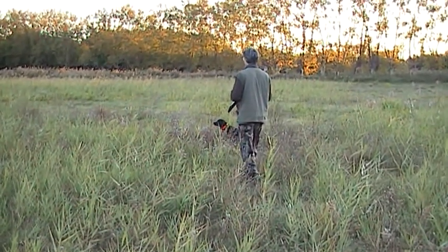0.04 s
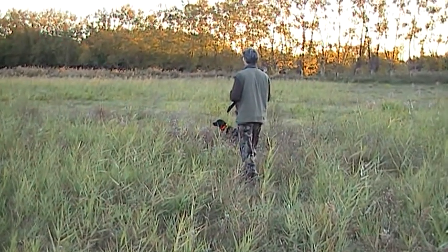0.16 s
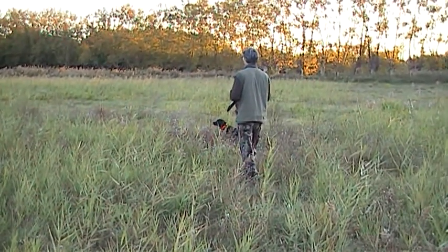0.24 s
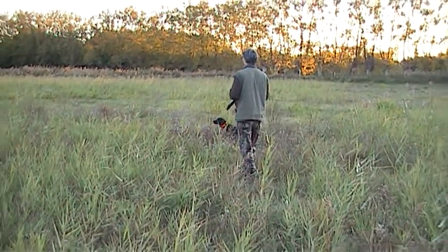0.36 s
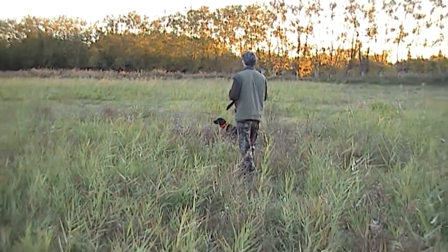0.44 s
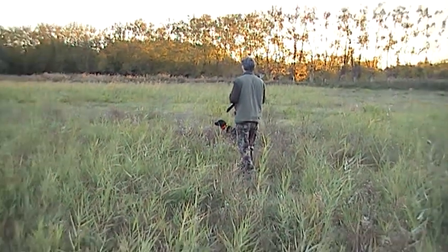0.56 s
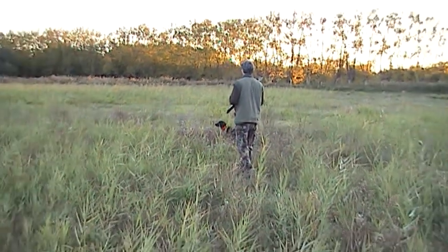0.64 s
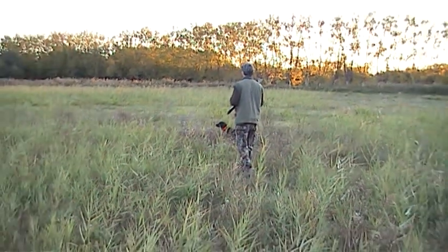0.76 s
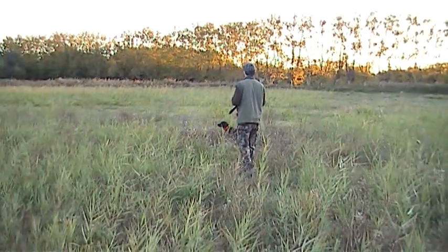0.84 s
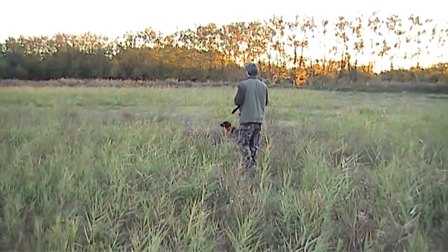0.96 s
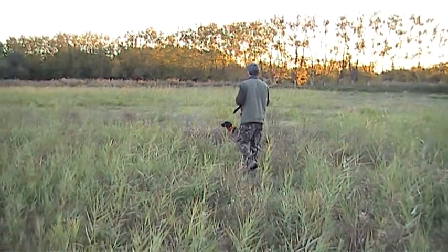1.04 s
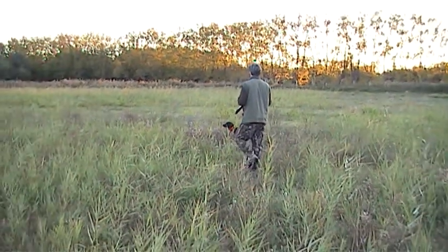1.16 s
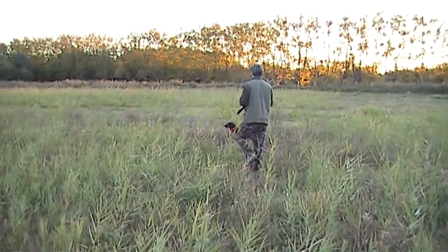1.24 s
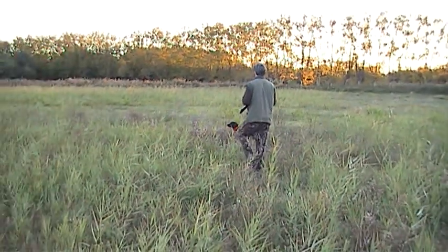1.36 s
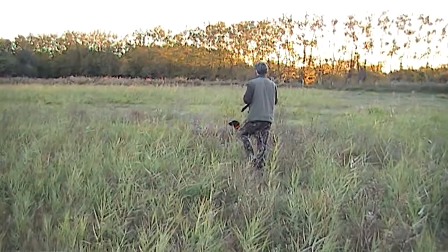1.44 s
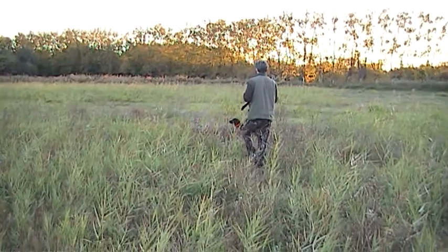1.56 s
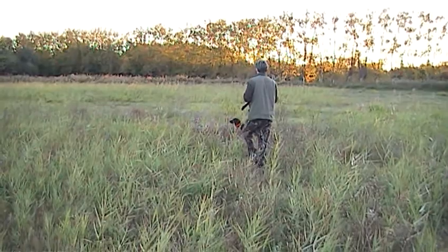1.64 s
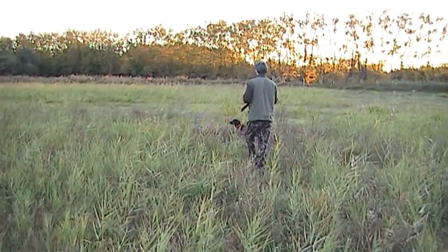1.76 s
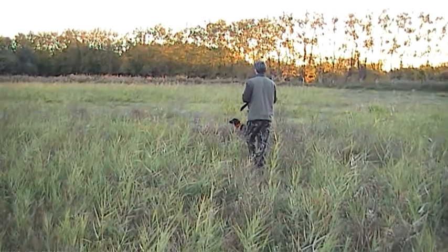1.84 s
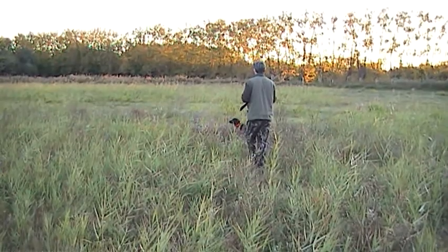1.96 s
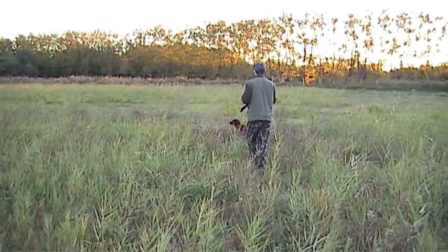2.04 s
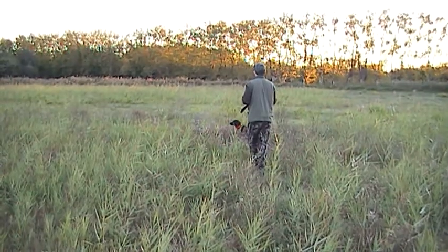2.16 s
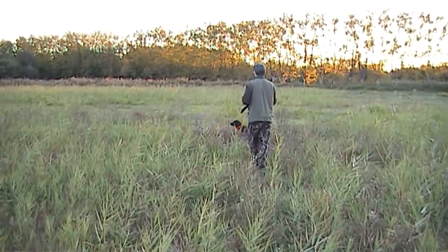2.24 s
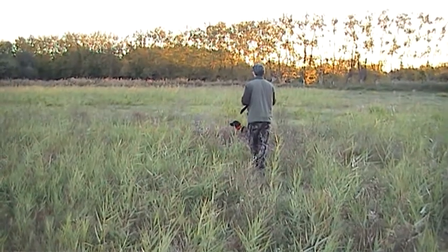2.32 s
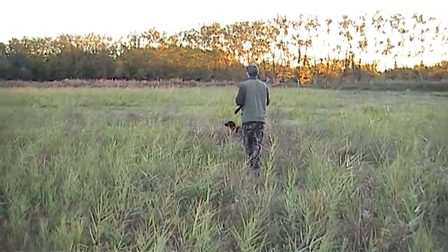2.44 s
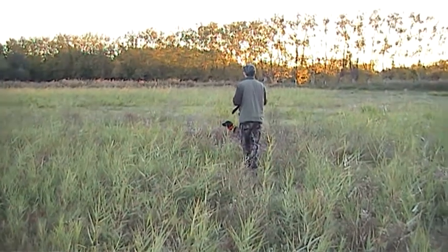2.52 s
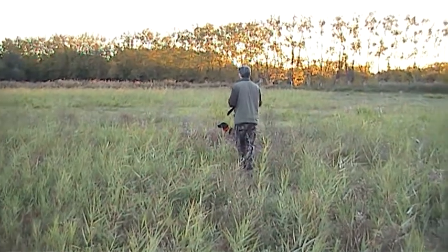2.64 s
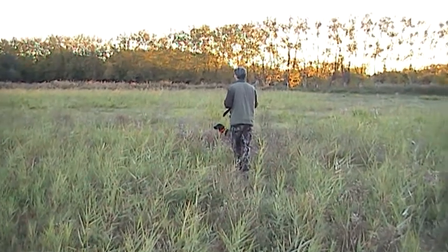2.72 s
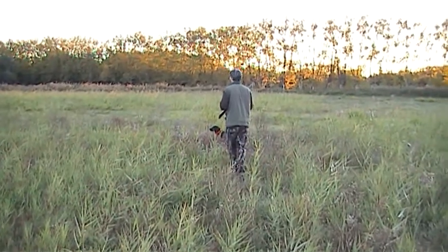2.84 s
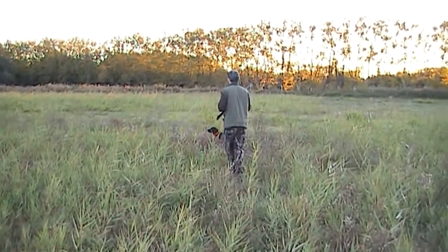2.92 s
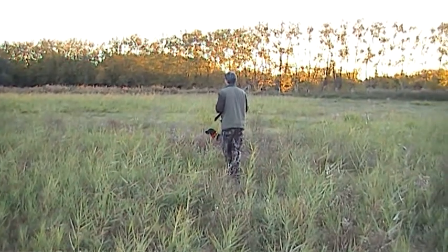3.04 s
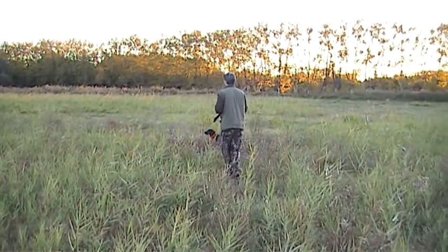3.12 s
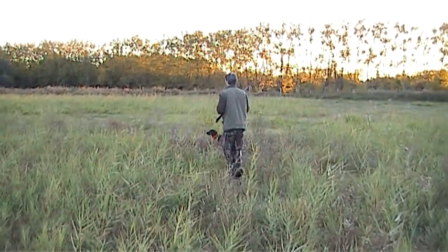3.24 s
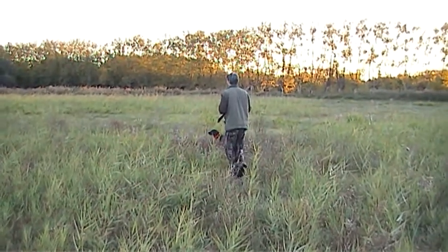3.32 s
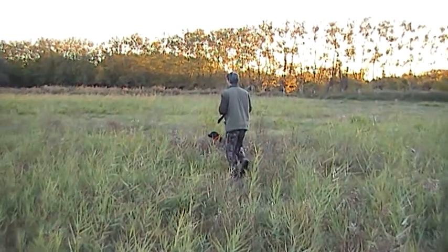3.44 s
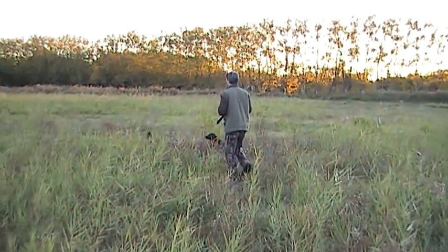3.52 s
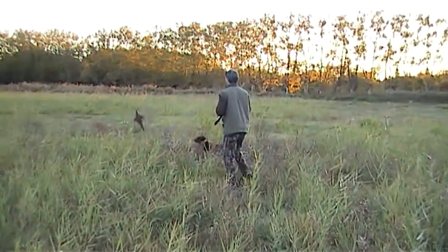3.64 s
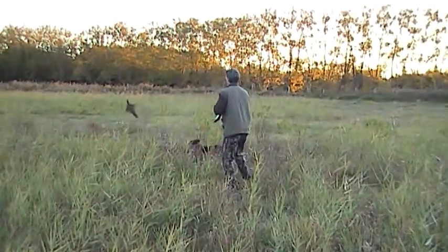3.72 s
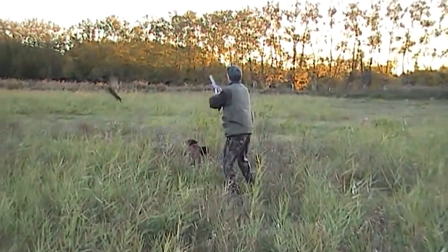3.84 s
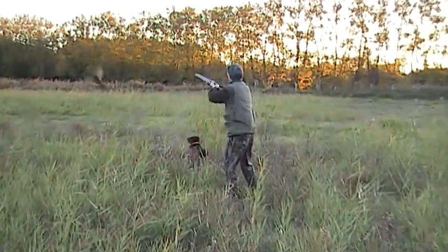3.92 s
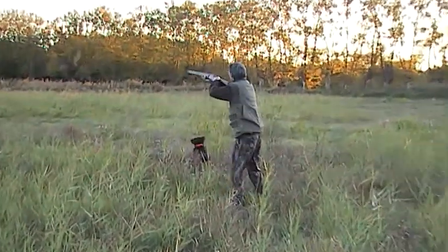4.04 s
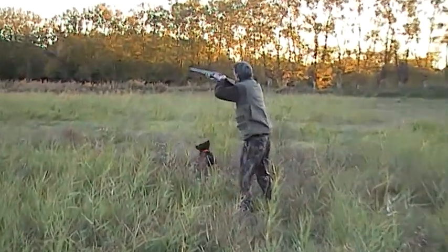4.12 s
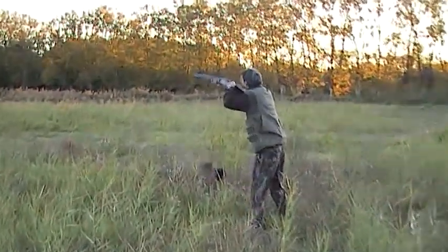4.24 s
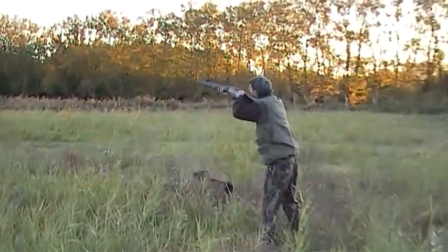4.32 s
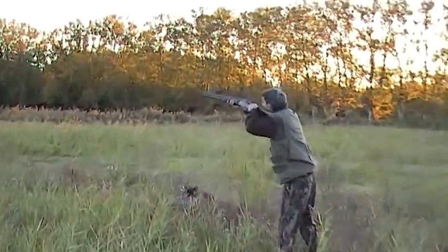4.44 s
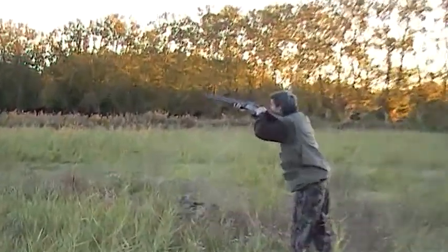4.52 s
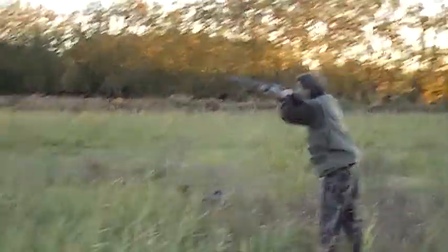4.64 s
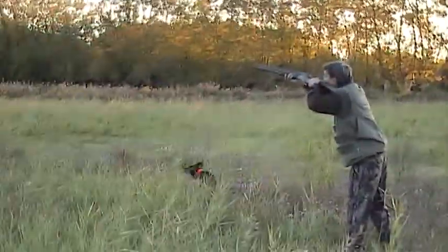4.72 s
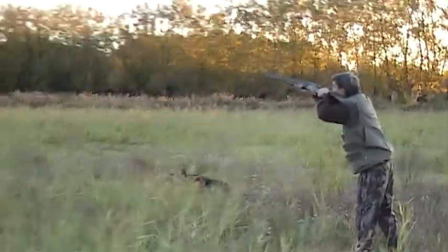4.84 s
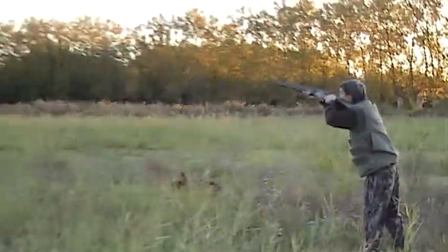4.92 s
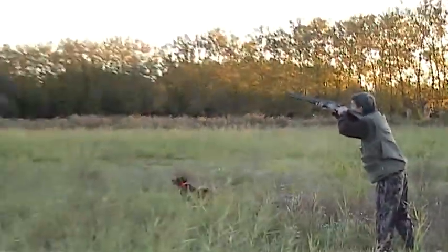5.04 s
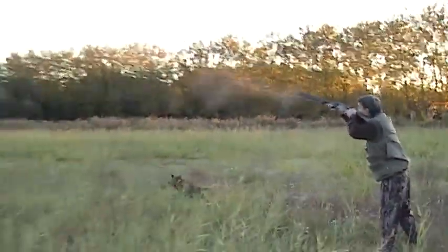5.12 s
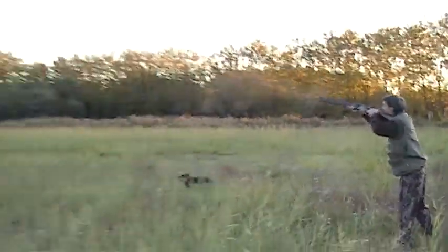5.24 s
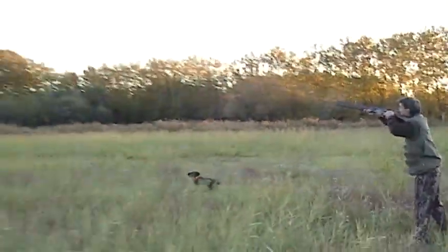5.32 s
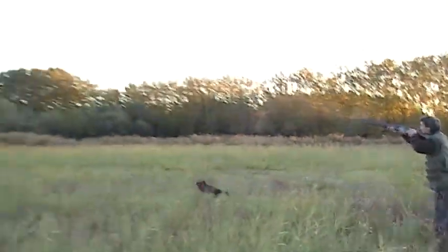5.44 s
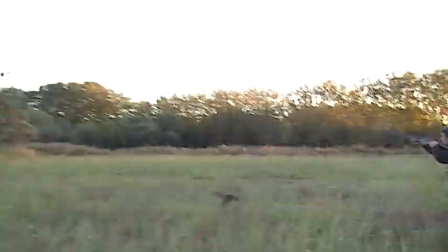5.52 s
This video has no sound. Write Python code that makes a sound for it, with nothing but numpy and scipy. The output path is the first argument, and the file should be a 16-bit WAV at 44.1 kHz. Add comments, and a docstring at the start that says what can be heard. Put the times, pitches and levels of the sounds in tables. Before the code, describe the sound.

Outdoors in an open field, a hunter and dog move softly through tall dry grass over a faint countryside murmur. A pheasant suddenly thrashes out and whirrs away with quick wingbeats. The rustling grows, the gun knocks dully and clicks brightly, then a single shot overloads the close camera microphone, followed by hiss and rolling tree-line echoes.

```python
"""One gunshot overloads the microphone, hisses back from the grass and rolls along the tree line.
Before it, a hunter and his dog wade through tall grass in a quiet field edged by trees.
A pheasant bursts out of cover and whirrs away; the gun is shouldered with a knock and a click.
Coloured noise bursts make the impacts and wingbeats, random clicks the grass, feather whirr and
returning shot, gliding tones the whistles; the blast adds a bare pressure pulse."""
import sys
import numpy as np
from scipy import signal
from scipy.fft import rfft, irfft
from scipy.io import wavfile

SR = 44100
rng = np.random.default_rng(int(sys.argv[2]) if len(sys.argv) > 2 else 0)


def wav_record(signal):
    """Record a signal, one row per channel, as 16-bit PCM in the file named by sys.argv[1]."""
    frames = np.transpose(np.atleast_2d(signal))
    bounded = np.clip(frames, -1, 1)
    # unit amplitude maps onto the largest positive 16-bit level
    quanta = np.round(bounded * 32767).astype(np.int16)
    wavfile.write(sys.argv[1], SR, quanta)


N = 245758
TIME = np.arange(N) / SR
BINS_HZ = np.maximum(np.fft.rfftfreq(8192, 1 / SR), 1)

# resonances of the air squeezed from under a wing: [f/Hz, width/Hz, relative level/dB]
WING = [(150, 230, -4.5), (490, 340, 2.5), (690, 400, 1), (1090, 320, -9), (1580, 470, -7), (2345, 400, 0),
        (3460, 1100, -9), (7500, 3000, -14.5)]
# unrelated sound between the channels for a source at one place: [f/Hz, side level/dB]
DIRECT = [(100, -40), (900, -19), (2200, -15.5), (4000, -10), (7500, -11), (11000, -13)]

# the bird breaks cover (s); steady stir of the grass while stalking and once the dog runs (dB)
FLUSH_S, STALKING_DB, RUNNING_DB = 3.47, -70, -59.5
# first downstroke (s) and even rate of the wings (per s)
TAKEOFF_S, BEATS_PER_S = 3.584, 12.2
BLAST_S = 5.1325


def from_db(db):
    """Decibels to gain."""
    return 10 ** (np.asarray(db) / 20)


def rms_one(x):
    """Scale to unit power."""
    return x / np.sqrt(np.mean(np.abs(x) ** 2) + 1e-20)


def gains(points):
    """A (Hz, dB) table as a gain at every frequency."""
    hz, db = np.transpose(points)
    return from_db(np.interp(np.log(BINS_HZ), np.log(hz), db))


def causal(gain):
    """Minimum-phase response of unit power with the given magnitude: nothing sounds early."""
    cepstrum = irfft(np.log(rms_one(gain) + 1e-6))
    half = len(cepstrum) // 2
    cepstrum[1:half] *= 2
    cepstrum[half + 1:] = 0
    return np.exp(rfft(cepstrum))


def colour(points):
    """Response of unit power that follows a (Hz, dB) table."""
    return causal(gains(points))


def body(modes):
    """Response of resonances with steep skirts and dark valleys between them."""
    peaks = []
    for hz, width, db in modes:
        detuning = (BINS_HZ ** 2 - hz ** 2) / (BINS_HZ * width)
        peaks.append(from_db(db) / (1 + detuning ** 2))
    return causal(np.linalg.norm(peaks, axis=0))


def dulled(top_hz, order=6):
    """Gain that falls steeply above a frequency."""
    return 1 / np.sqrt(1 + (BINS_HZ / top_hz) ** (2 * order))


def sound(drive, response, spread, off_axis=1):
    """Two unrelated drives pass through a response to the mid and side of a stereo microphone."""
    # pressure difference between the two microphone ports: [f/Hz, side level/dB]
    ports = [(100, -38), (4000, -26), (7500, -27), (9500, -3.5), (11500, 7), (15000, -1)]
    # sound arriving at an angle leaves this difference a quarter cycle ahead
    paths = response * np.array([np.ones(len(BINS_HZ)), gains(spread), 1j * off_axis * gains(ports)])
    kernels = np.fft.fftshift(irfft(paths), axes=-1)
    mid, side, gradient = signal.oaconvolve(drive[[0, 1, 0]], kernels, mode="same", axes=-1)
    return mid + (side + gradient) * [[1], [-1]]


def drift(rate):
    """Smooth chance that changes about `rate` times a second; spread 1."""
    return rms_one(np.interp(TIME * rate, np.arange(N // 20), rng.standard_normal(N // 20)))


def swell(s, half_s):
    """A smooth rise and fall of height 1 around a moment."""
    return np.exp(-((TIME - s) / half_s) ** 2)


def flushed(rise_s=0.014):
    """0 while the bird sits tight, 1 once it has broken cover."""
    return np.clip((TIME - FLUSH_S) / rise_s, 0, 1)


def hold_and_fade(age, db, hold_s, fade_db_per_s):
    """Gain that holds for a while and then dies away."""
    return from_db(db - fade_db_per_s * np.maximum(age - hold_s, 0))


def grains(per_s, size_db):
    """Two streams of random clicks of uneven size, unit power."""
    born = rng.random((2, N)) < per_s / SR
    sizes = from_db(size_db * np.minimum(rng.exponential(1, (2, N)), 4))
    return rms_one(born * sizes * rng.choice([-1, 1], (2, N)))


def bursts(rows, size=4096):
    """Short white bursts that swell and die, one for each row (s, dB, rise s, fall s)."""
    lead = size // 4   # room for the rise ahead of each moment
    out = np.zeros((2, N + size))
    t = (np.arange(size) - lead) / SR
    for s, db, rise, fall in rows:
        shape = np.exp(-np.where(t < 0, (t / rise) ** 2, t / fall))
        burst = shape * rng.standard_normal((2, size))
        for _ in range(2):   # an impact excites all frequencies evenly
            burst = np.sqrt(shape) * irfft(np.exp(1j * np.angle(rfft(burst))))
        start = min(round(s * SR), N)
        out[:, start:start + size] += from_db(db) * rms_one(burst) * np.sqrt(np.mean(shape ** 2))
    return out[:, lead:lead + N]


def whistles(rows, waver):
    """Brief, unsteady tones sliding in pitch: rows (s, length s, start Hz, end Hz, dB)."""
    out = np.zeros(N)
    unsteady = 1 + waver * drift(900)
    for s, length, start_hz, end_hz, db in rows:
        on = (TIME > s) & (TIME < s + length)
        along = (TIME[on] - s) / length
        hz = (start_hz + (end_hz - start_hz) * along) * unsteady[on]
        tone = np.sin(2 * np.pi * np.cumsum(hz) / SR)
        arch = np.sqrt(np.maximum(np.sin(np.pi * along), 0))
        out[on] += from_db(db) * arch * tone
    return out


def field(drive_db=-58.55, waver_db=0.66):
    """Distant murmur of the countryside: wavering noise arriving from all sides."""
    # colour of the far murmur: [f/Hz, relative level/dB per Hz]
    murmur = [(15, -69), (25, -25), (45, -7.5), (71, 0.5), (183, -3), (482, 0), (648, -4.5), (997, -4.5),
              (1240, -10.5), (2630, -20), (4150, -19.5), (4750, -22), (8130, -21.5), (12200, -22.5),
              (15500, -27)]
    # unrelated sound between the channels when it comes from all round: [f/Hz, side level/dB]
    diffuse = [(60, -14.5), (300, -14), (900, -10), (2000, 2.5), (4000, 4), (7500, 4), (12000, -19)]
    hush = gains([(1200, 0.5), (3000, -3.0), (8000, -7.5)])   # softens the treble
    drive = rng.standard_normal((2, N)) * from_db(drive_db + waver_db * drift(5.16))
    return sound(drive, colour(murmur) * hush, diffuse)


def rustle_db():
    """How hard the grass is brushed: a steady stir that jumps at the flush, and single sweeps."""
    # legs, dog and bird sweeping through the grass: [t/s, level/dB, half length/s]
    swishes = [(0.203, -68, 0.06), (.64, -67, 0.037), (1.688, -65.5, 0.31), (2.26, -67, 0.18),
               (2.676, -69, 0.082), (3.313, -59, .11), (3.548, -48, 0.041), (3.707, -49.5, 0.085),
               (3.92, -53.5, 0.056), (4.295, -54.5, 0.12), (4.485, -55.5, 0.03), (4.65, -52.5, 0.1),
               (4.804, -52.5, 0.051), (4.964, -50.5, 0.037), (5.075, -51, .035)]
    stir = from_db(STALKING_DB + (RUNNING_DB - STALKING_DB) * flushed())
    sweeps = [from_db(db) ** 2 * swell(s, half_s) for s, db, half_s in swishes]
    return 10 * np.log10(stir ** 2 + sum(sweeps))


def small_snaps(level_db, count=18, follows=0.45, stalking_tick_db=-52.5, stalking_wood_db=-59):
    """Lesser snaps at random moments, stronger in harder-brushed grass: (s, dB, woody part dB)."""
    moments = ((np.arange(count) + rng.random(count)) * N / count).astype(int)
    lift_db = follows * (level_db[moments] - STALKING_DB)
    return [(i / SR, stalking_tick_db + db, stalking_wood_db + db) for i, db in zip(moments, lift_db)]


def grass(blades_db=-1.06, clump_db=2.0, tick_trim_db=-3, wood_trim_db=1):
    """Blades scrape in clumps of tiny clicks; now and then a stem or a twig snaps."""
    # colour of dry blades: [f/Hz, relative level/dB per Hz]
    dry_blades = [(90, -25), (160, -5.5), (260, -4.5), (550, -7), (930, -2.5), (1300, -6), (2900, -6.5),
                  (4100, -6), (4900, -16), (6200, -6), (8300, 0.5), (10000, -7.5), (12000, -20),
                  (15500, -32)]
    # the bird thrashing free of the cover: [t/s, level/dB, rise/s, fall/s]
    thrash = [(3.474, -50, 0.0042, 0.0083), (3.517, -44, 0.0027, .008), (3.527, -38, 0.0025, 0.013),
              (3.584, -33.5, 0.0043, 0.0056), (3.66, -47, 0.0024, 0.041)]
    # loudest stems snapping, levels ahead of the trims: [t/s, level/dB, woody part level/dB]
    loud_snaps = [(0.0817, -48, -41), (0.1017, -46.5, -56), (0.7605, -46.5, -63), (0.802, -61, -51.5),
                  (2.7048, -45, -57), (3.042, -49.5, -53), (3.4079, -40.5, -58), (3.6177, -27.5, -43),
                  (3.6406, -51, -37), (3.7086, -43, -32.5), (3.7329, -27.5, -46), (4.4965, -33, -49),
                  (4.5985, -34, -47), (4.7945, -32, -49)]
    # twigs giving way underfoot, levels ahead of the treble cut: [t/s, level/dB, rise/s, fall/s, top f/Hz]
    twig_rows = [(.085, -47.5, 0.00066, 0.0097, 6000), (1.423, -43.5, 0.0006, 0.0036, 2400),
                 (1.762, -44.5, 0.00046, 0.0017, 9000), (1.767, -41, 0.0014, 0.0028, 5000)]
    # colour of the twigs: [f/Hz, relative level/dB per Hz]
    twig_colour = [(250, -24), (480, 0.5), (800, 2.5), (1500, -7.5), (2100, -9.5), (2800, -16), (3400, -10),
                   (4500, -22), (6000, -31), (14000, -48)]
    tick = [(1000, -9), (5000, -13.0), (7800, 6.5), (9500, 0), (12000, -14), (15000, -22)]
    wood = [(150, -26), (700, 3.5), (3000, 5.5), (4300, 1.0), (6000, -9), (14000, -21)]

    level_db = rustle_db()
    scrape = grains(5000, size_db=1.5) * from_db(level_db + blades_db + clump_db * drift(66))
    blades = scrape + bursts(thrash)
    snaps = list(loud_snaps) + small_snaps(level_db)
    ticks = bursts([(s, db + tick_trim_db, 0.0002, 0.0009) for s, db, woody in snaps])
    cracks = bursts([(s, woody + wood_trim_db, 0.0002, 0.0012) for s, db, woody in snaps])
    parts = [(blades, dry_blades), (ticks, tick), (cracks, wood)]
    out = sum(sound(drive, colour(spectrum), DIRECT) for drive, spectrum in parts)
    for *burst, top_hz in twig_rows:
        out = out + sound(bursts([burst]), colour(twig_colour) * dulled(top_hz), DIRECT)
    return out


def far_birds():
    """Small birds far off in the trees: faint gliding tones."""
    # [t/s, length/s, start f/Hz, end f/Hz, level/dB]
    chirps = [(.82, 0.2, 2840, 2800, -76), (2.54, .065, 5500, 5270, -75.5), (2.735, 0.077, 3720, 4200, -74),
              (2.925, .05, 5200, 5000, -75)]
    return whistles(chirps, waver=0.0073)


def wingbeats(count=10):
    """Evenly spaced downstrokes that follow the bird's effort: rows (s, level dB)."""
    # strength of the downstrokes, hard in the climb, a lull, a second spurt, then away: [t/s, level/dB]
    effort = [(3.65, -39.5), (3.83, -40.5), (3.99, -46.5), (4.08, -42.5), (4.24, -40.5), (4.33, -49)]
    s = TAKEOFF_S + np.arange(count) / BEATS_PER_S
    return list(zip(s, np.interp(s, *np.transpose(effort))))


def downstroke(s, db, tension, uneven_db=2, rise_s=0.0065, fall_s=0.011):
    """One puff of air with singing quills; the wing is spread a little differently each time."""
    # flight feathers singing, pitch ahead of the tension: [length/s, start f/Hz, end f/Hz, level re stroke/dB]
    quill_rows = [(.009, 2877, 2125, -7), (.01, 4090, 3320, -11.5)]
    chance_db = uneven_db * rng.standard_normal(len(WING))
    modes = [(hz * tension, width, mode_db + more_db)
             for (hz, width, mode_db), more_db in zip(WING, chance_db)]
    quills = [(s - length / 2, length, start_hz * tension, end_hz * tension, db + quill_db)
              for length, start_hz, end_hz, quill_db in quill_rows]
    puff = sound(bursts([(s, db, rise_s, fall_s)]), body(modes), DIRECT)
    return puff + whistles(quills, waver=0.034)


def pheasant(upstroke_lead_s=0.017, upstroke_db=-10, push_db=-17.0, tension_spread=0.039,
             whirr_db=-59.5, climb_db=8, flutter_db=3.5):
    """Kick-off, wing clap, and downstrokes each with a weak flick ahead and a soft low push."""
    # feet pushing off the ground: [t/s, level/dB, rise/s, fall/s]
    kick = [(3.525, -50, 0.0055, 0.039)]
    # dull resonance of the soil: [f/Hz, width/Hz, relative level/dB]
    soil = [(215, 140, 0)]
    # colour of the feather whirr: [f/Hz, relative level/dB per Hz]
    feathers = [(40, -7), (100, -4), (300, -0.5), (900, -2.5), (1400, -12), (2500, -10.5), (4000, -14.5),
                (5200, -22), (12000, -39)]
    push = colour([(15, -2), (45, -2), (110, -3.0), (300, -14), (900, -45), (5000, -82)])

    beats = wingbeats()
    strokes = sum(downstroke(s, db, 1 + tension_spread * rng.standard_normal()) for s, db in beats)
    # the wings clap together on the first stroke
    clap = bursts([(TAKEOFF_S, -32, 0.0027, 0.005)])
    flicks = bursts([(s - upstroke_lead_s, db + upstroke_db, 0.003, 0.006) for s, db in beats])
    pushes = bursts([(s, db + push_db, 0.012, 0.05) for s, db in beats])
    # the whirr swells in the steep climb
    level_db = whirr_db + climb_db * swell(3.69, half_s=0.051)
    whirr = flushed() * grains(3000, size_db=1.0) * from_db(level_db + flutter_db * drift(70))
    parts = [(bursts(kick), body(soil)), (clap + flicks, body(WING)),
             (pushes, push), (whirr, colour(feathers))]
    return strokes + sum(sound(drive, response, DIRECT) for drive, response in parts)


def flight_whistles():
    """Thin falling tones during the flight."""
    # [t/s, length/s, start f/Hz, end f/Hz, level/dB]
    falling = [(3.575, 0.0068, 4900, 3920, -41), (3.673, 0.018, 5200, 3830, -43),
               (4.044, 0.052, 4370, 4200, -55), (4.800, .019, 4450, 3920, -48.5),
               (4.949, 0.023, 4270, 3870, -53.5)]
    return whistles(falling, waver=0.017)


def gun_handling():
    """Dull knocks ring the stock; a bright click rings the safety catch."""
    # hard knocks, as of gun and gear: [t/s, level/dB, rise/s, fall/s]
    knocks = [(4.424, -41.5, 0.0011, 0.0028), (4.4363, -20.5, 0.0024, 0.0011),
              (4.4388, -18, 0.0013, 0.0031), (4.533, -49, .002, 0.0064), (4.629, -40, 0.00085, 0.002),
              (4.654, -39, 0.00071, 0.0012)]
    # what they ring with: [f/Hz, width/Hz, relative level/dB]
    stock = [(190, 290, -24), (450, 360, -16), (825, 290, 0), (1107, 140, -0.5), (1550, 300, -4.5),
             (1880, 170, -1.5), (2170, 450, -6.5), (2680, 490, -6), (3080, 200, -8.5), (3700, 1200, -19),
             (4230, 850, -7), (7800, 4500, -26.5)]
    # click of the safety catch: [t/s, level/dB, rise/s, fall/s]
    click = [(4.7333, -16, 0.00015, 0.0013)]
    # modes of the catch: [f/Hz, width/Hz, relative level/dB]
    catch = [(614, 360, -6), (1090, 340, -1.5), (2090, 340, 0.5), (3000, 700, -7), (4300, 780, -2),
             (5600, 1800, -9), (6640, 580, -3), (7600, 470, 4), (11200, 2500, -11), (14000, 1500, -15)]
    spread = [(300, -10), (1000, -11), (2200, -8), (7500, -4), (12000, -8)]
    return sound(bursts(knocks), body(stock), spread) + sound(bursts(click), body(catch), spread)


def shot(blast_db=5, blast_s=0.00029):
    """A sharp crack around one steep muzzle pressure pulse, then a slow swing of suction."""
    # pellet crackle, muzzle blast and ground bounce: [t/s, level/dB, rise/s, fall/s]
    shot_rows = [(5.1296, -14.5, 0.00031, 0.006), (5.1320, 8, 0.00037, 0.0014),
                 (5.1352, -12.5, 0.00087, 0.0022)]
    # colour of the crack: [f/Hz, relative level/dB per Hz]
    crack_colour = [(120, -27), (240, -12), (330, -1), (450, -6), (800, 0.5), (1300, -5.5), (2100, -0.5),
                    (3000, -5), (3800, 0), (5000, -9), (5900, -2), (8500, -2), (15500, -23.5)]
    spread = [(100, -35), (900, -8), (2200, -10), (4000, -8), (7500, -14), (11000, -2)]
    age = np.maximum(TIME - BLAST_S, 0)
    push = from_db(blast_db) * np.exp(-(age / blast_s) ** 2) * (age > 0)
    suction = from_db(-23) * np.exp(-age / 0.011) * np.sin(2 * np.pi * 36 * age)
    crack = sound(bursts(shot_rows), colour(crack_colour), spread, off_axis=0.2)
    return crack * from_db([[-1.2], [1.2]]) + push - suction   # the crack leans to the second channel


def shot_echoes(build_s=0.18, trees_pan_db=1.0, dulling_s=0.31, air_hz=9500, uneven_db=0.7):
    """Countless stalks return a bright hiss at once; the duller roll of the trees builds behind it."""
    # colour of the shot scattered by the grass: [f/Hz, relative level/dB per Hz]
    from_grass = [(53, -49), (90, -18.5), (200, -3), (332, 0.5), (420, -12), (478, -6.5), (605, -11),
                  (749, -4), (948, -8), (1200, -7.5), (1800, -10), (3420, -5.5), (4720, -13), (7890, 0.5),
                  (14100, -18), (15000, -37)]
    # colour of the shot scattered by the trees: [f/Hz, relative level/dB per Hz]
    from_trees = [(65, -28), (120, -10), (200, -1.5), (370, -25), (560, -4), (900, 1.5), (1200, -0.5),
                  (1400, -9), (1750, -2.5), (2400, -3.5), (3900, -1.5), (4900, -11), (8200, -8.5),
                  (11000, -14.5), (14000, -57)]
    # distinct echoes off the trees: [t/s, level/dB, rise/s, fall/s]
    echo_rows = [(5.191, -27.5, 0.0041, 0.0096), (5.324, -30.5, 0.0016, 0.0055),
                 (5.393, -28, 0.0029, 0.0059), (5.567, -23, 0.0049, 0.011)]
    # colour of those echoes: [f/Hz, relative level/dB per Hz]
    echo_colour = [(200, -31), (450, 0.5), (750, 2), (1200, 0), (2500, -12), (4200, -15), (6000, -21),
                   (12000, -56)]
    spread = [(100, -26), (900, -22), (4000, -14), (7500, -5.5), (11000, -1)]

    age = np.maximum(TIME - BLAST_S, 0)
    hiss_gain = hold_and_fade(age, db=-22.5, hold_s=0.1, fade_db_per_s=85) * (age > 0)
    stalks = grains(14000, size_db=1.5) * hiss_gain * from_db(uneven_db * drift(60))
    roll_gain = hold_and_fade(age, db=-27.5, hold_s=0.3, fade_db_per_s=34)
    roll_gain = roll_gain * np.minimum(age / build_s, 1)
    trunks = grains(4000, size_db=1.0) * roll_gain * from_db(1.2 * drift(90))
    # later returns have crossed more air and lose their top
    near, air = np.exp(-age / dulling_s), dulled(air_hz)
    hiss = sound(stalks * near, colour(from_grass), spread)
    hiss = hiss + sound(stalks * (1 - near), colour(from_grass) * air, spread)
    trees = sound(trunks, colour(from_trees) * air, DIRECT)
    trees = trees + sound(bursts(echo_rows), colour(echo_colour), DIRECT)
    return hiss + trees * from_db([[trees_pan_db], [-trees_pan_db]])


def scene():
    """Everything heard from a few steps behind the hunter."""
    birds = pheasant() + flight_whistles() + far_birds()
    return field() + grass() + birds + gun_handling() + shot() + shot_echoes()


def record(dry, cutoff_hz=15800):
    """The blast overloads the microphone input, and the top is cut."""
    clipped = np.clip(dry, -0.95, 0.95)
    return signal.sosfilt(signal.ellip(10, 0.1, 80, cutoff_hz, fs=SR, output="sos"), clipped)


dry = scene()
out = record(dry)
wav_record(out)
```